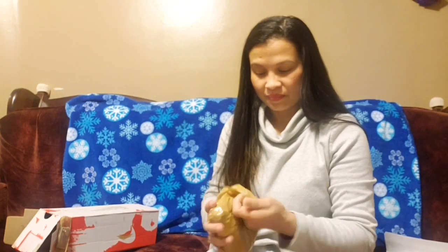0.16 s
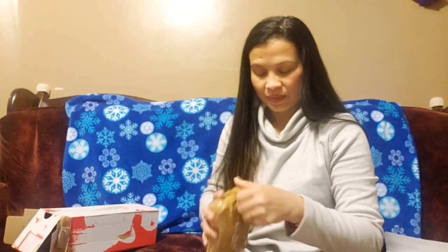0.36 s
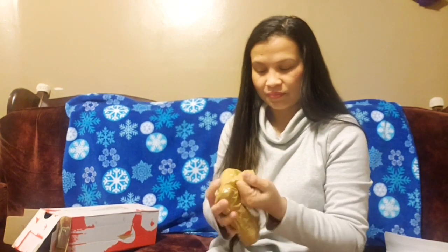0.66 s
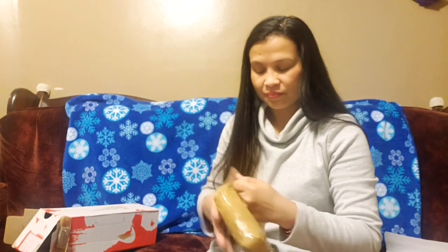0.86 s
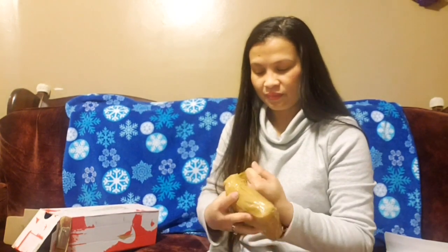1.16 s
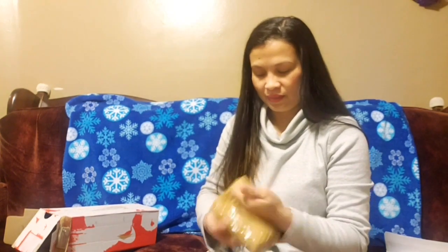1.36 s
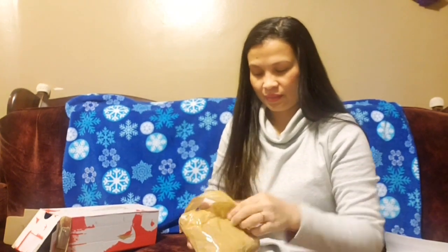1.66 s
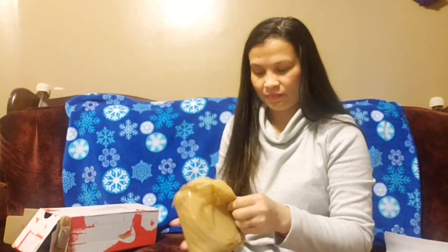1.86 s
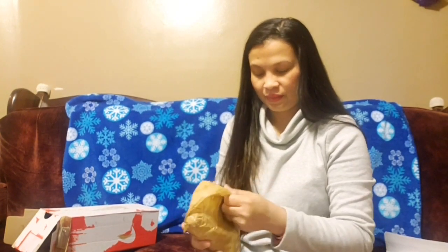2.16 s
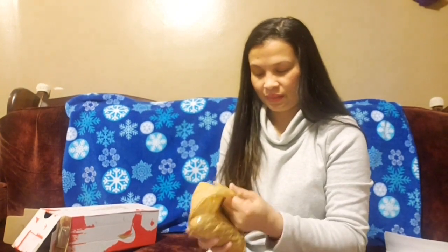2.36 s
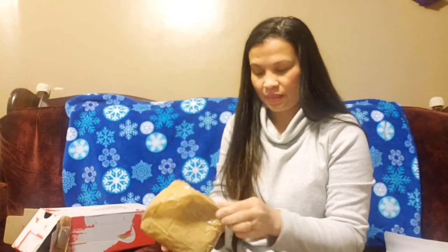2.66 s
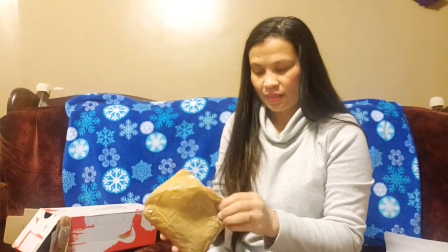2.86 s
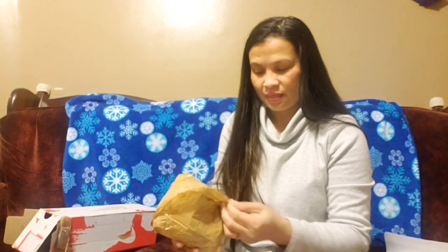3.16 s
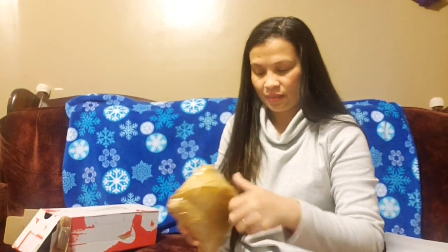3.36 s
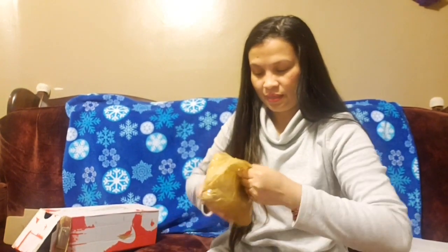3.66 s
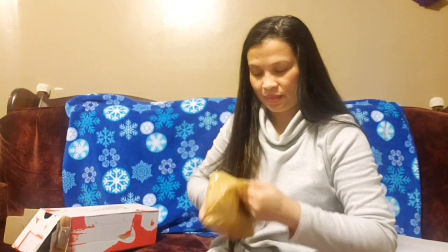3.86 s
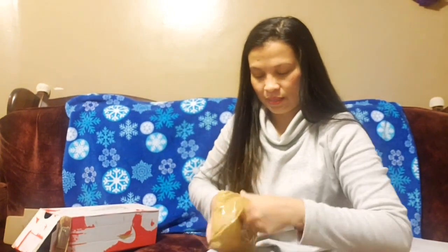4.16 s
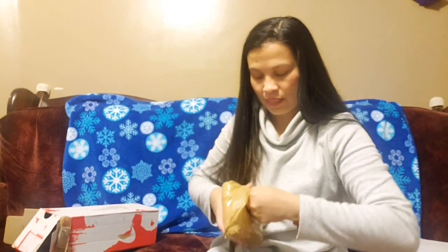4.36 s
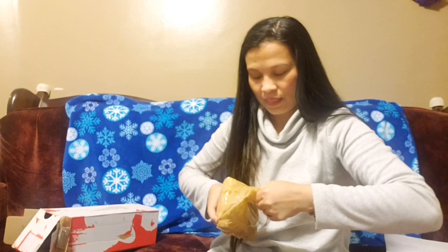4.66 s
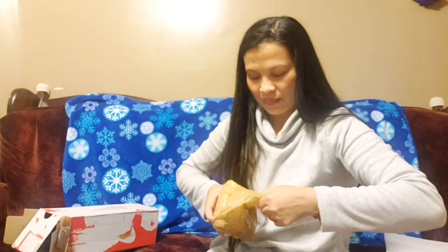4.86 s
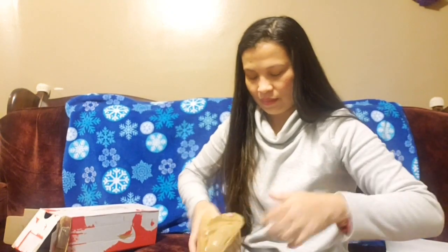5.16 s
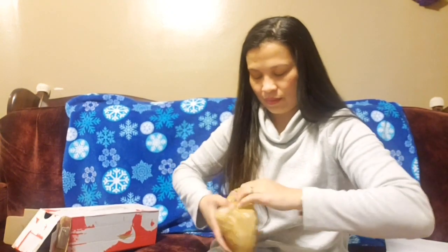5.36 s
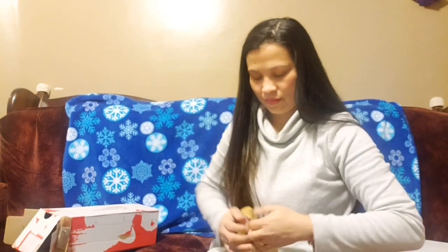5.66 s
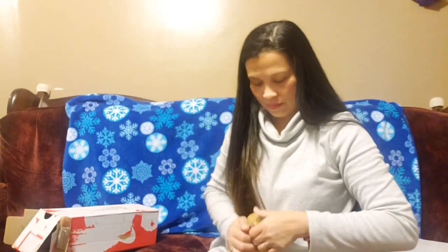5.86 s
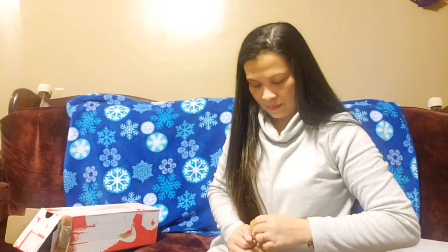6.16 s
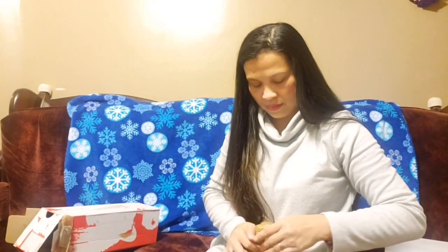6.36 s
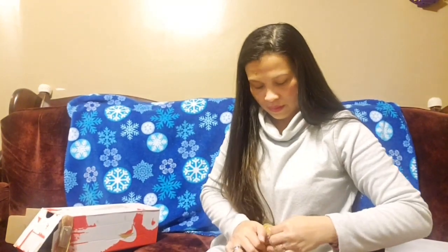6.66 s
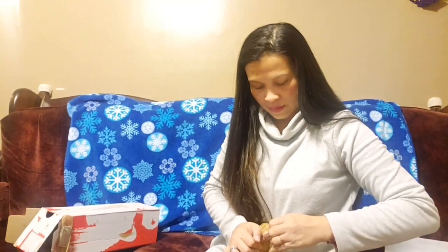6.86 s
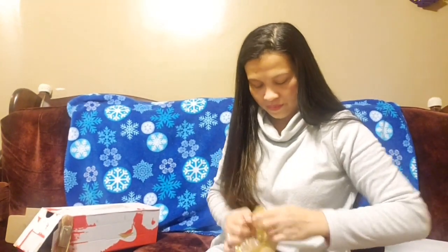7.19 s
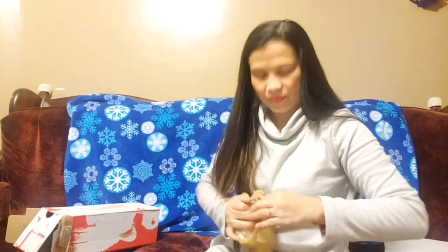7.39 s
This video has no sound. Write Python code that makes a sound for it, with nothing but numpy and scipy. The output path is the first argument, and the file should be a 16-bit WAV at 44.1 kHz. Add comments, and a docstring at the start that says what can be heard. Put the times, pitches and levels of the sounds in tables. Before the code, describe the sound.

Stiff taped plastic crackles irregularly as fingers pull, turn and squeeze it. Loud creases pop over fine crinkles and sliding rustle, big folds thud hollowly, and a short room tail follows. The busiest bursts fall early, around two seconds and before five; then the hands let go briefly and resume softer handling on the lap. Close stereo pickup, slightly left, with very faint room air.

```python
"""A parcel wrapped in taped plastic film is turned, pulled and picked at by hand on a sofa in a small living room.
Throughout, creases snap over tiny crackles and the rustle of sliding film; large folds thud and a short tail follows.
Strong snaps come at half a second with a dull press; a low squeak at 2.6 s precedes more snaps around 3 s.
Snaps cluster again from 4.5 to 5 s. After a second press at 5 s the hands pause, and from 5.5 s the parcel lies
fuller-sounding in the lap, with a third press at 5.8 s, a high squeak near 6.5 s and scattered snaps to the end."""
import sys
import numpy as np
from scipy import signal
from scipy.io import wavfile
from scipy.ndimage import uniform_filter1d

SR = 44100
rng = np.random.default_rng(int(sys.argv[2]) if len(sys.argv) > 2 else 0)


def pcm_store(signal):
    """Save signal as 16-bit PCM."""
    levels = np.round(np.clip(np.atleast_2d(signal), -1, 1) * 32767)
    wavfile.write(sys.argv[1], SR, levels.astype(np.int16).T)


N = 331831  # length in samples


def gain_of(db):
    """Level law: amplitude grows tenfold for every 20 dB."""
    return 10 ** (np.asarray(db) / 20)


def evened(x):
    """Power normalisation: scales to rms 1."""
    return x / np.sqrt(np.mean(x ** 2) + 1e-20)


def read(points, hz):
    """Interpolation on a logarithmic frequency axis, the scale of pitch."""
    table_hz, value = np.transpose(points)
    return np.interp(np.log(hz + 1), np.log(table_hz), value)


def add(mix, s, sound):
    """Superposition: mixes a sound in at time s."""
    part = mix[:, max(round(s * SR), 0):][:, :sound.shape[1]]
    part += sound[:, :part.shape[1]]


def colour(x, points, power=1, size=4096):
    """Minimum-phase filtering: a causal response to the given spectrum keeps attacks sharp."""
    bin_hz = abs(np.fft.fftfreq(size, 1 / SR))
    log_gain = power * np.log(gain_of(read(points, bin_hz)))
    response = np.exp(np.conj(signal.hilbert(log_gain)))
    taps = np.fft.ifft(response).real[:size // 2]
    return signal.oaconvolve(x, taps[None], axes=1)[:, :N]


def split(x, hz):
    """Crossover: doubled Butterworth filters give the parts below and above hz."""
    halves = [signal.butter(2, hz, kind, fs=SR, output="sos") for kind in ("low", "high")]
    return [signal.sosfilt(np.vstack([half, half]), x) for half in halves]


def registers(x, body_hz=720, edge_hz=2750):
    """Band division by radiator size: thud of the whole fold, crack of the crease, tick of its edge."""
    thud, rest = split(x, body_hz)
    crack, tick = split(rest, edge_hz)
    return np.array([thud, crack, tick])


def register_gains(db, body_db, bright_db):
    """Spectral balance: gains of thud, crack and tick, the outer two relative to the middle band."""
    return gain_of([db + body_db, db, db + bright_db])


def ring(x, hz, width_hz):
    """Resonance: a one-pole decay, shifted to a fixed or moving pitch, with gain 1 at its peak."""
    turn = np.exp(2j * np.pi * np.cumsum(hz * np.ones(x.shape[-1])) / SR)
    pole = np.exp(-np.pi * width_hz / SR)
    return 2 * (turn * signal.lfilter([1 - pole], [1, -pole], x / turn)).real


# Spectral shape of the still air of the room.
# Each row: frequency in Hz, relative power density in dB per Hz.
AIR_SPECTRUM = [(25, -8), (110, -8), (300, -13), (2500, -5), (15000, -21)]


def still_air(rms_db=-77):
    """Diffuse background noise: partly correlated between the microphones and spectrally shaped."""
    own, shared = rng.standard_normal((2, N)), rng.standard_normal(N)
    return gain_of(rms_db) * evened(colour(own + shared, AIR_SPECTRUM))


# Reverberation of the room.
# Each row: frequency in Hz, time in seconds for the tail to fall by 60 dB.
ROOM_DECAY = [(150, 0.054), (450, 0.51), (4500, 0.55), (14000, 0.44)]


def room(x, first_s=0.0043, early=0.77, early_s=0.044, shared_hz=520):
    """Reverberation: sparse reflections, stronger at first, die by band; the bass is alike on both sides."""
    t = np.arange(SR * 2 // 3) / SR
    taps = rng.standard_normal((3, len(t))) * (rng.random((3, len(t))) < .25)
    taps *= (t > first_s) * (1 + early * np.exp(-t / early_s))
    low, high = split(taps, shared_hz)
    hz, age, bands = signal.stft(low[-1] + high[:2], SR, nperseg=256)
    decay = gain_of(-60 * age / read(ROOM_DECAY, hz)[:, None])
    tail = signal.istft(bands * decay, SR, nperseg=256)[1]
    return signal.fftconvolve(x, evened(tail) / np.sqrt(tail.shape[1]), axes=1)[:, :N]


def cycling_room(x, turns_per_s=2.3, count=3):
    """Amplitude modulation: fixed reflection patterns swell and fade in a steady cycle, so no colour stands still."""
    phase = 2 * np.pi * turns_per_s * np.arange(N) / SR
    patterns = [room(x * np.cos(phase + np.pi * k / count)) for k in range(count)]
    return sum(patterns) * np.sqrt(2 / count)


# The fingers stirring the film between moves.
# One row: level in dB, body and brightness in dB against the middle band (body before the lap's gain).
HOLD = (-58.5, -7.5, 2.4)
# The pulls, squeezes and turns of the parcel.
# Each row: start in seconds, length in seconds, level in dB, swell from start to end in dB,
# body and brightness in dB against the middle band.
MOVES = [(0.0, 0.11, -46.5, -9.5, -2, 7), (0.191, 0.072, -54, -1.5, -2.5, 5.5),
         (0.374, 0.054, -52.5, 5, 1, 11), (0.43, 0.1, -31, 10.5, -0.5, 1), (.545, 0.05, -46, -11, 9, 10),
         (1.006, 0.22, -51.5, -12, -7.5, 2.5), (1.177, 0.094, -41, 2.5, -5.5, -0.5),
         (1.351, 0.13, -55, -9, 6.5, 11), (1.61, 0.11, -51, -9, -2.5, -2.5),
         (1.798, 0.029, -52.5, -1.5, 2.5, 4.5), (1.935, 0.1, -56, -8, -11, 2.5),
         (2.06, 0.15, -43.5, 9.5, -7, 3.5), (2.232, .24, -49, 4.5, 4.5, 1.5),
         (2.56, .2, -50.5, 6.5, -4.5, 0.5), (2.795, 0.044, -55, 5, -4, 7.5),
         (2.851, 0.13, -44.5, -1, -5.5, 4), (3.176, 0.048, -48.5, -5, 10.5, 3.5),
         (3.417, 0.081, -45, -3.5, -3.5, 3.5), (3.579, 0.16, -53.5, 5, -15, 5),
         (3.908, 0.088, -44.5, 5, -16, -3.5), (4.112, .16, -50, 4, 8, 4),
         (4.422, 0.038, -51.5, 10, -5, 10.5), (4.453, 0.14, -40.5, 2.5, 3.5, 7),
         (4.559, .042, -34, 2, 2.5, 2), (4.668, 0.18, -42, -7, -3.5, -7),
         (5.029, 0.017, -42, 0.5, 12.5, 6.5), (5.311, 0.19, -49.5, -7, 4.5, 3.5),
         (5.58, 0.28, -55.5, -0.5, 9, 2), (5.815, 0.047, -47.5, -2, 9.5, -1),
         (5.919, 0.1, -53.5, -10, 7.5, 5.5), (6.232, 0.12, -48.5, -4, -2, 0),
         (6.48, 0.086, -58.5, 6, -18.5, 2), (6.65, 0.11, -67, -13, 25, 13.5),
         (6.87, 0.18, -51.5, -13.5, 11.5, 2), (7.07, 0.18, -49, 7, 6.5, 1.5),
         (7.227, 0.068, -43, 1.5, 15, -2), (7.424, 0.026, -55.5, -3, 13, 5)]
# The hand rests or lifts off the parcel.
# Each row: start in seconds, length in seconds.
LET_GO = [(0.802, .085), (1.493, 0.1), (3.029, .375), (5.066, 0.56), (6.16, 0.056)]


def handling(step=32, grab_s=0.002, stop_s=0.014, settle_db=-19, settle_s=0.15,
             untouched_db=-6.5, lap_s=5.5, lap_body_db=12):
    """Addition of powers: strengths of thud, crack and tick as hands hold, move and let go of the film."""
    t = np.arange(0, N, step) / SR
    level_db, body_db, bright_db = HOLD
    held = 1 - np.max([(t > s) & (t < s + length) for s, length in LET_GO], axis=0)
    # film that is left alone settles more quietly
    settling = gain_of(settle_db + (1 - held) * untouched_db)
    # held film sounds fuller once the parcel lies in the lap
    held_body_db = body_db + lap_body_db * (t > lap_s)
    power = held * register_gains(np.full(len(t), level_db), held_body_db, bright_db) ** 2
    for s, length, db, swell_db, body_db, bright_db in MOVES:
        progress = np.clip((t - s) / length, 0, 1)
        after = np.maximum(t - s - length, 0)
        attack = np.clip((t - s) / grab_s, 0, 1)
        # a quick stop, then a slower settling
        release = np.maximum(np.exp(-after / stop_s), settling * np.exp(-after / settle_s))
        gains = register_gains(db + swell_db * (progress - .5), body_db, bright_db)
        power = power + (attack * release * gains) ** 2
    return np.array([np.interp(np.arange(N) / SR, t, np.sqrt(p + 1e-12)) for p in power])


def sleeves(rms_db=-85, hz=140, width_hz=120):
    """Band-limited friction noise: a low rumble of cloth that comes and goes with the hands."""
    rumble = ring(ring(rng.standard_normal(N), hz, width_hz), hz, width_hz)
    crack_strength = handling()[1]
    return gain_of(rms_db) * evened(rumble * crack_strength)


# The parcel is pressed against the lap.
# Each row: start in seconds, length in seconds, level in dB.
PRESSES = [(0.45, 0.27, -80), (5.03, 0.072, -70), (5.802, 0.24, -76.5)]


def presses(hz=105, width_hz=70):
    """Damped low resonance: a swelling and fading push rumbles dully as the parcel bears down on cloth."""
    out = np.zeros((2, N))
    t = np.arange(N // 8) / SR
    for s, length, db in PRESSES:
        push = rng.standard_normal(len(t)) * np.interp(t, [0, length / 10, length], [0, 1, 0])
        rumble = ring(ring(push, hz, width_hz), hz, width_hz)
        add(out, s, gain_of(db) * rumble[None] * np.sqrt(length * SR / np.sum(rumble ** 2)))
    return out


# A fingertip sticks and slips on the film.
# Each row: start in seconds, length in seconds, slips per second, loudest overtone in Hz,
# level in dB before the overall colour.
SQUEAKS = [(2.6, 0.091, 525, 503, -67.5), (6.459, 0.069, 1000, 4200, -53)]


def squeaks(jitter=0.026, glide=0.044, octaves=0.52, rasp=0.55, count=9):
    """Stick-slip friction: fast, uneven slips make a short, raspy stack of overtones."""
    out = np.zeros((2, N))
    for s, length, rate_hz, loudest_hz, db in SQUEAKS:
        u = np.linspace(-1, 1, round(length * SR))
        waver, scrape = evened(uniform_filter1d(rng.standard_normal((2, len(u))), size=50))
        turns = np.cumsum(rate_hz * (1 + glide * u / 2 + jitter * waver)) / SR
        k = np.arange(1, count)[:, None]
        strength = np.exp(-.5 * (np.log2(k * rate_hz / loudest_hz) / octaves) ** 2)
        overtones = strength * np.cos(2 * np.pi * (k * turns + rng.random(k.shape)))
        tone = overtones.sum(0) * (1 + rasp * scrape)
        add(out, s, gain_of(db) * evened(tone * signal.windows.tukey(len(u), .5))[None])
    return out


# Note of the air pocket under the film, which changes with the grip.
# Each row: time in seconds, frequency in Hz.
POCKET_NOTE = [(.5, 271), (2.201, 264), (2.32, 760), (2.699, 473), (3.15, 275), (4, 279), (4.241, 590),
               (4.55, 342), (5.05, 354), (5.701, 530), (7.05, 585), (7.299, 514)]


def pocket(x, hollow=0.049, tight_hollow=0.18, width_hz=150, broad=0.77, broad_hz=460):
    """Cavity resonance: trapped air lends the thuds a hollow note and carries little below it."""
    hz = np.interp(np.arange(N) / SR, *np.transpose(POCKET_NOTE))
    thud, rest = split(x, 580)
    # a tightly gripped, high-pitched pocket radiates the least bass and rings the most
    tight = np.clip(np.log2(hz / hz.min()), 0, 1)
    bass = signal.lfilter(*signal.butter(1, 170, fs=SR), thud)
    thud = thud - tight * bass
    note = (hollow + tight_hollow * tight) * ring(thud + rest, hz, width_hz)
    return rest + broad * ring(thud, hz, broad_hz) + note


def buckle(ring_s, facet_hz, facet_width=0.24, flutter=0.35, flutter_s=0.0027, apart=0.98, size=512):
    """Snap-through buckling: a crease flips, the facet beside it rings and the sheet flutters briefly."""
    t = np.arange(size) / SR
    decay = np.exp(-t / ring_s) + flutter * np.exp(-t / flutter_s)
    shared, left, right = rng.standard_normal((3, size)) * decay
    # the sound reaches the right microphone one sample later, and each hears its own treble
    burst = np.array([shared, np.append(0, shared[:-1])])
    burst = burst + apart * split(np.array([left, right]), 1005)[1]
    facet_hz = min(facet_hz, SR / 4)
    burst = burst + ring(burst, facet_hz, facet_width * facet_hz)
    # each register gets the energy it has in a single click
    parts, click = registers(burst), registers(signal.unit_impulse(size))
    return np.array([evened(part) * np.sqrt(np.mean(share ** 2)) for part, share in zip(parts, click)])


def crinkle(per_s=420, crowd_db=28, spread_db=4.5, largest=3.06, ring_s=0.00029, facet_hz=3200,
            crackle_db=-1.66, rustle_db=-11, rough_db=2.5, count=96):
    """Random pulse process and friction: tiny creases flip, more when worked harder, while film slides."""
    gains, crackle = handling(), np.zeros((2, N))
    level_db = 20 * np.log10(gains[1])
    # per_s holds at the mean level; crowd_db more makes flips ten times as frequent
    chance = per_s / SR * 10 ** ((level_db - level_db.mean()) / crowd_db)
    at = np.flatnonzero(rng.random(N) < chance)
    size_db = spread_db * np.minimum(rng.exponential(1, N)[at], largest)
    # denser flips are each weaker, so that the power follows the hands
    sizes = evened(gain_of(size_db)) / np.sqrt(chance[at])
    creases = np.array([buckle(ring_s * rng.uniform(0.46, 3.8), facet_hz * 2 ** rng.normal())
                        for _ in range(count)])
    creases = creases * gain_of(3.35 * rng.standard_normal((count, 3, 1, 1)))
    creases = evened(creases) / np.sqrt(creases[0].size / 2)
    for n, size, k in zip(at, sizes, rng.integers(0, count, N)[at]):
        add(crackle, n / SR, size * np.tensordot(gains[:, n], creases[k], 1))
    # film sliding on film and skin catches and lets go every few milliseconds
    unevenness = evened(uniform_filter1d(rng.standard_normal(N), size=260))
    grip = evened(gain_of(rough_db * unevenness))
    own_treble = split(rng.standard_normal((2, N)), 920)[1]
    slide = evened(rng.standard_normal(N) + own_treble) * grip
    rustle = (registers(slide) * gains[:, None]).sum(0)
    return gain_of(crackle_db) * crackle + gain_of(rustle_db) * rustle


# The loud buckling creases.
# Each row: time in seconds, relative energy in dB, body and brightness in dB against the middle band.
SNAPS = [(0.0716, -20, 1, 16.5), (0.2977, -20, -11, -13.5), (0.51, 1, 4.5, -8), (0.5303, -2.5, 5.5, -4),
         (0.574, -9, 10, 5.5), (0.8782, -21.5, -6, 1), (1.0108, -35, 8, 19.5), (1.1151, -22, -16, 11),
         (1.1792, -16.5, 11.5, 7.5), (1.1957, -28, -14, 18.5), (1.2206, -28, 2, 20), (1.2266, -26, -3, 16),
         (1.2399, -25.5, -7, 17.5), (1.26, -21.5, 18.5, 10.5), (1.614, -22, -25, 9),
         (1.6448, -26.5, -4, 10.5), (1.7814, -22, -19, 2.5), (2.0084, -23, -16, -6), (2.0386, -34, -22, 9),
         (2.0635, -8, -34, -4.5), (2.0777, -19.5, -19, 7.5), (2.0997, -14, -15, 5), (2.1168, -13, -8, 8.5),
         (2.1534, -13.5, -0.5, 5), (2.161, -6.5, -21, -1.5), (2.1873, -8.5, -17, -4),
         (2.1923, -12.5, -4, 4.5), (2.3145, -5, 9.5, 0), (2.4039, -22.5, 16, 6), (2.8597, -5.5, -0.5, -25),
         (2.9129, -20, -4, 6), (2.9165, -13, -29, 9.5), (2.934, -10.5, -6, -4), (2.965, -21, -17, 9),
         (2.971, -13.5, -31.5, 7.5), (3.179, -15, -6, -4.5), (3.42, -24, 2, -2), (3.4536, -11.5, -35, -2),
         (3.4604, -7, -29, 0), (3.5093, -15, -24, 8.5), (3.5812, -16, -9, 2), (3.5936, -18, -5, 1.5),
         (3.6487, -5, -6, 1.5), (3.7218, -25, -6, 13.5), (3.733, -21, -7, -1), (3.7939, -18, -31, -19),
         (3.8742, -21, -34, -19), (3.91, -22, -36, -3), (3.918, -31, -38, 15.5), (3.9787, -5.5, 6, 0.5),
         (4.2108, -18.5, 18, 11), (4.3094, -26, 0, 5.5), (4.4546, -16.5, 0, 2), (4.5275, -10, -3, -1),
         (4.5766, -1.5, -3, 1), (4.6726, -7, 3, 6.5), (4.694, -7, 3, 10), (4.7777, -12, -10, 0),
         (4.8006, -25.5, 3, 21.5), (4.806, -2, -1.5, 2), (4.832, -8, -16, -4), (5.0364, -4.5, 8.5, -5.5),
         (5.3914, -20, 3, -5), (5.4407, -23, 5, 8.5), (5.8125, -14, 4.5, 3.5), (5.8192, -12, 7.5, 2),
         (5.9462, -20.5, 4.5, 1), (5.991, -24, 12, 11.5), (6.0013, -21, 5, 5.5), (6.0269, -20, -6, 0.5),
         (6.064, -34.5, -1, 17), (6.102, -27.5, -1, 16), (6.121, -21, -15, 2), (6.3225, -27, 1, 5),
         (6.3324, -17.5, 2, -6), (6.5118, -21.5, 10, 1.5), (6.6611, -31, 9, 10.5), (6.6781, -23.5, 16.5, 0),
         (6.716, -29.5, 0, 10), (6.864, -32.5, 22, 0), (6.8771, -10, 0.5, 1.5), (6.9315, -25.5, -1, 11.5),
         (6.9623, -23.5, 5, 9.5), (7.0057, -7.5, 5.5, -12), (7.0306, -14, 4, 5.5), (7.1233, -10.5, 0, -5),
         (7.1929, -12.5, -15, -0.5), (7.2021, -19, 6, -4), (7.2383, -20, 24.5, 13), (7.3015, -16, -3, 1.5),
         (7.3494, -32.5, 17, 20), (7.4656, -25, -12, -13)]


def snaps(ring_s=0.00051, doubling_db=13, beam=0.066, own_colour=0.36, lead_db=-13, lead_s=.003,
          facet_hz=3100, octave_db=15, count=3):
    """Snap-through and directivity: loud creases, each with a short faint build-up, sent direct and to the room."""
    direct, spread = np.zeros((2, 2, N))
    # the room hears a crease from all sides, so its colour evens out there
    even = registers(signal.unit_impulse(512))[:, None]
    for s, db, body_db, bright_db in SNAPS:
        gains = register_gains(db, body_db, bright_db)
        hz = facet_hz * 2 ** (bright_db / octave_db)
        # big folds take longer to flip and fill the room; small facets tick crisply at the microphone
        size_db = max(db, db + bright_db)
        flip_s = ring_s * 2 ** (size_db / doubling_db)
        lead_ins = [(s - lead_s * (k - rng.random()), gain_of(lead_db) / k) for k in range(1, count + 1)]
        for at, strength in [(s, 1)] + lead_ins:
            crease = buckle(flip_s, hz, flutter=0.19)
            all_round = (even + own_colour * crease) / np.hypot(1, own_colour)
            add(direct, at, strength * gain_of(-beam * size_db) * np.tensordot(gains, crease, 1))
            add(spread, at, strength * np.tensordot(gains, all_round, 1))
    return direct, spread


# Overall colour of the parcel's sound and its reflections.
# Each row: frequency in Hz, gain in dB.
OVERALL_COLOUR = [(40, -22), (100, -24.5), (170, -8), (260, -2.5), (450, -2.5), (700, -2), (1300, 0.4),
                  (2800, -2), (4500, -4), (6200, -6.5), (7400, -5), (10000, -13.5), (12000, -10.5),
                  (16000, -11.5)]
# Stereo lean of the parcel's sound and its reflections.
# Each row: frequency in Hz, left minus right gain in dB.
STEREO_LEAN = [(200, 4.5), (1100, 1.5), (2400, 2.5), (6000, 4.5), (10000, -1), (15000, -2.5)]


def wrapping(snap_room_db=-1.5, crinkle_room_db=-4.5):
    """Sum of direct and reverberant sound, given one overall colour and level differences between the sides."""
    loud, spread = [pocket(part) for part in snaps()]
    fine = pocket(crinkle()) + squeaks()
    wet = cycling_room(gain_of(snap_room_db) * spread + gain_of(crinkle_room_db) * fine)
    left, right = colour(loud + fine + wet, OVERALL_COLOUR)
    # half the lean goes to the left side, half is taken from the right
    return np.vstack([colour(left[None], STEREO_LEAN, 1 / 2), colour(right[None], STEREO_LEAN, -1 / 2)])


def scene():
    """Superposition of still air, cloth rumbles and the wrapping with its reflections."""
    return still_air() + sleeves() + presses() + wrapping()


def record(dry, edge_hz=16000):
    """Band limitation: a linear-phase low-pass filter removes the highest treble."""
    taps = signal.firwin(401, edge_hz, window=("kaiser", 9), fs=SR)
    return signal.oaconvolve(dry, taps[None], "same")


dry = scene()
out = record(dry)
pcm_store(out)
```